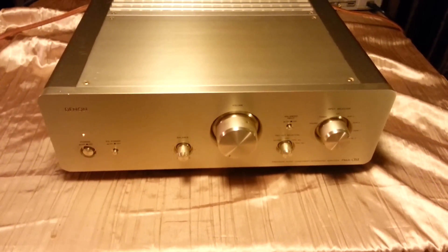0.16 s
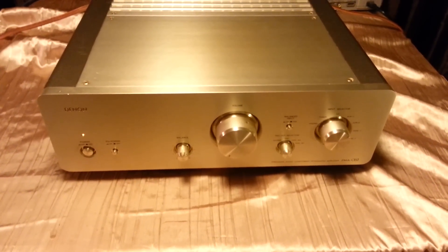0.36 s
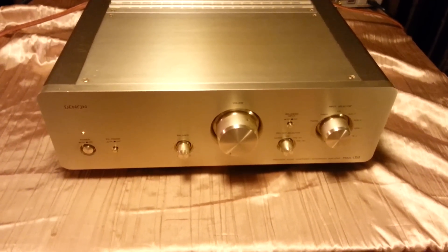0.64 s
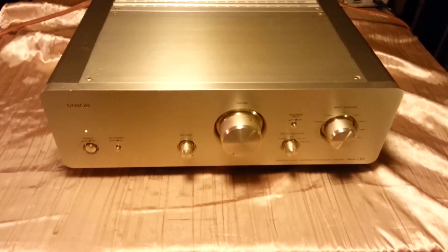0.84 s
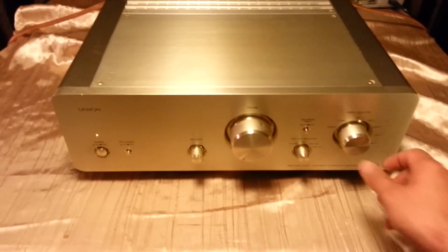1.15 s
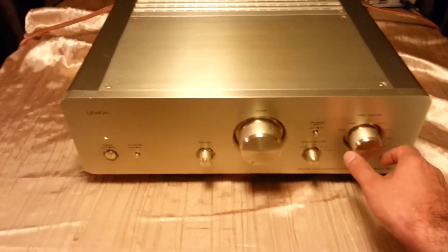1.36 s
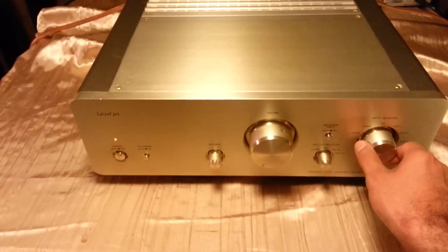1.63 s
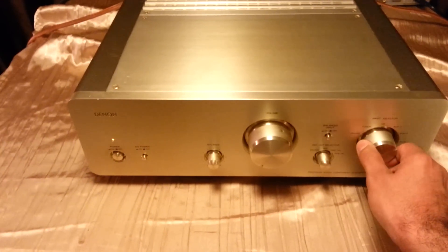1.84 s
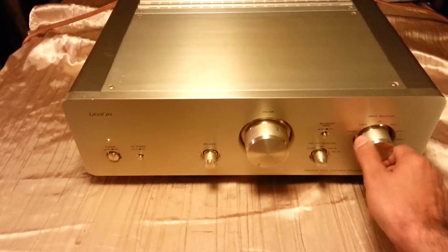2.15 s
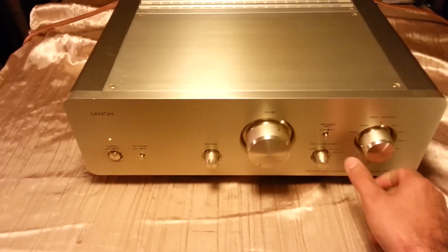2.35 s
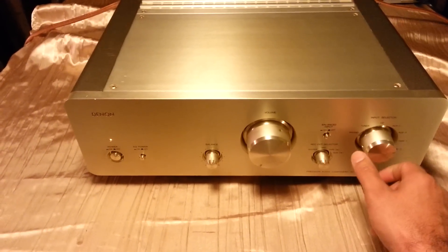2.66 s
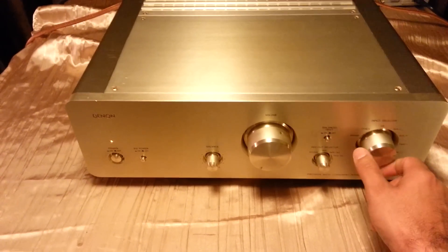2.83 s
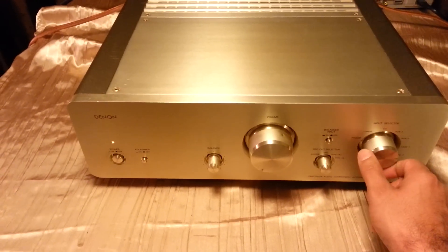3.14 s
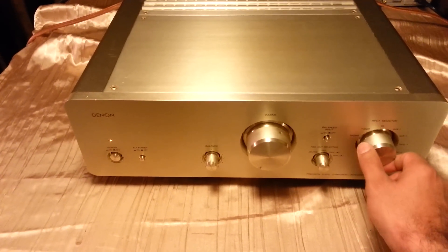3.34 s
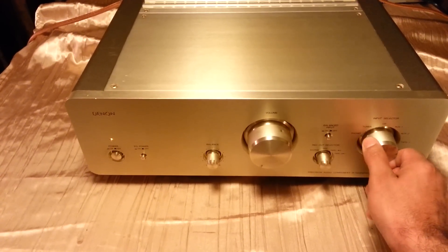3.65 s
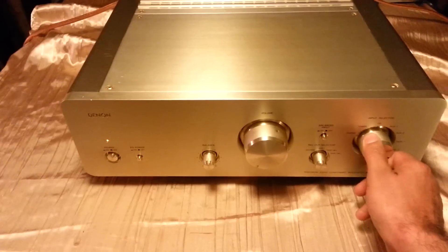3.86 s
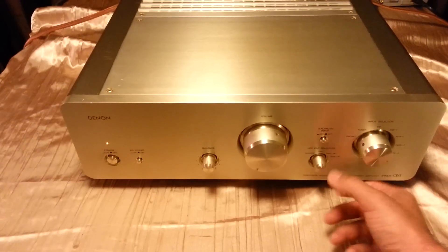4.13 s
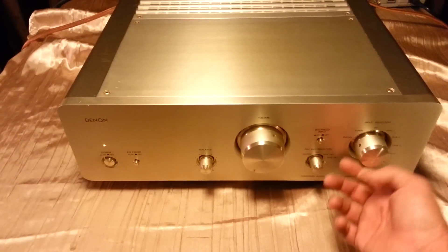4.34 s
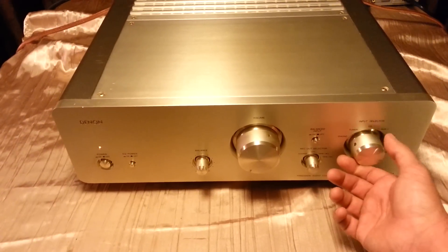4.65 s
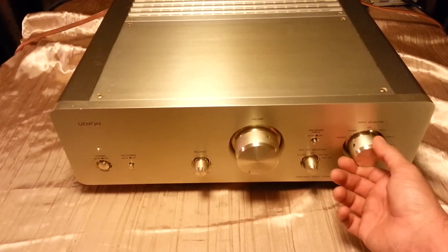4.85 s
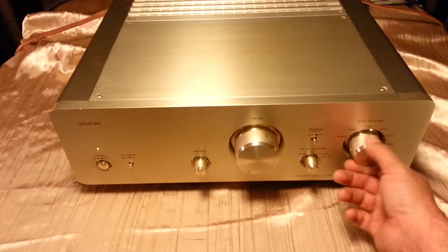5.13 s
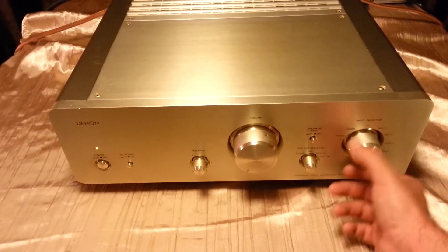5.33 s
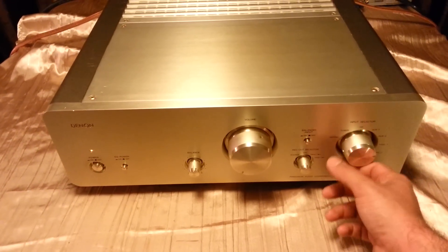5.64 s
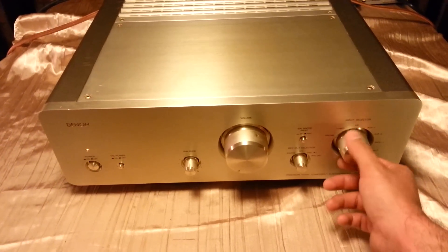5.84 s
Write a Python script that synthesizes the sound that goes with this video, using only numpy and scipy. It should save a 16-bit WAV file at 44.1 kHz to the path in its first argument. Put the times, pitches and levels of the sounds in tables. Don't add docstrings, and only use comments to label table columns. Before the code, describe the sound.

A stiff selector knob on a metal amplifier is turned three steps, each landing with a hard ringing clunk, over electrical buzz and low room hum.

```python
import sys
import numpy as np
from scipy import signal
from scipy.fft import rfft, irfft, next_fast_len
from scipy.io import wavfile
from scipy.ndimage import uniform_filter1d, map_coordinates

SR = 44100
rng = np.random.default_rng(int(sys.argv[2]) if len(sys.argv) > 2 else 0)


def log_audio(samples):
    frames = np.atleast_2d(samples).T
    limited = np.clip(frames, -1, 1)
    pcm = np.round(limited * 32767).astype(np.int16)
    wavfile.write(sys.argv[1], SR, pcm)


def elevation(decibels):
    levels = np.asarray(decibels, float)
    return 10 ** (levels / 20)


N = 264159

TOP_HZ = 14550
# ball leaves its notch (leave_s), clips the next edge (clip_s), drops home (drop_s)
TURNS = [
    (2.033, 2.0938, 2.099),
    (3.740, 3.8448, 3.8506),
    (5.155, 5.198, 5.2024),
]
# crack_db, rattle_db, rocking_db, panel_ring_db
FORCES = [
    (-9.5, -22, -4.5, -32),
    (-5.5, -20.5, 12.5, -24),
    (-3.5, -20.5, 8.5, -33),
]
# pitch_hz, width_hz, level_db
NOTCH = [(1420, 420, 3.5), (2000, 720, 4.5), (2700, 700, 5), (3430, 1500, 0.5), (5050, 1260, -3.5),
         (5570, 310, -7)]
# pitch_hz, width_hz, level_db
ROCKING = [(231, 32, 1.1), (488.2, 21, 4.8)]


def unit(x):
    return x / np.sqrt(np.mean(x ** 2) + 1e-20)


def along(points, hz):
    point_hz, value = np.transpose(points)
    return np.interp(np.log(hz + 1), np.log(point_hz + 1), value)


def filtered(x, response):
    size = next_fast_len(N + SR // 2)
    return irfft(rfft(x, size) * response(np.fft.rfftfreq(size, 1 / SR)), size)[..., :N]


def high_pass(f, hz, q):
    return -f * f / (hz * hz - f * f + 1j * f * hz / q)


def body(modes):
    def response(f):
        total = 0
        for k, (hz, width_hz, db) in enumerate(modes):
            resonance = 1j * f * width_hz / (hz * hz - f * f + 1j * f * width_hz)
            total = total + (-1) ** k * elevation(db) * resonance
        return total / np.sqrt(np.mean(abs(total) ** 2))
    return response


def ports(hz, alike):
    turn = np.arccos(np.clip(along(alike, hz), -1, 1)) / 2
    return np.array([[np.cos(turn), np.sin(turn)], [np.cos(turn), -np.sin(turn)]])


def wobble(rate):
    return map_coordinates(rng.standard_normal(int(N * rate / SR) + 4), [np.arange(N) * rate / SR])


def air():
    # pitch_hz, level_db per Hz
    rush_colour = [(30, -29), (60, -10), (100, -9.5), (200, -3), (300, -3.5), (420, -6.5), (650, -10),
                   (900, -14.5), (1500, -17), (2800, -19), (4500, -26), (6500, -29), (10000, -27),
                   (14400, -25.5)]
    # pitch_hz, likeness (0 to 1)
    rush_alike = [(60, 0.58), (250, 0.41), (600, 0.16), (1500, 0), (8000, 0)]
    # pitch_hz, level_db, unsteadiness_hz
    hum_tones = [(118.7, -59, 1.92), (180.4, -61, 5.44), (238, -63, 1.74), (277.6, -60, 7.75),
                 (373, -72.5, 0.88), (411, -55, 5.89), (864, -64.5, 5.93)]
    t = np.arange(N) / SR

    def colour(hz):
        return elevation(along(rush_colour, hz)) * (hz < TOP_HZ) * ports(hz, rush_alike)

    rush = unit(filtered(rng.standard_normal((2, N)), colour).sum(axis=1))
    rush_level = elevation(-50.5 + 0.4 * wobble(2.87))
    tones = 0
    for hz, db, unsteady_hz in hum_tones:
        level = elevation(db + 2.5 + 1.5 * wobble(10))
        cycles = hz * t + np.cumsum(unsteady_hz * wobble(12)) / SR
        tones = tones + level * np.sin(2 * np.pi * cycles)
    return rush_level * rush + tones * elevation([[.3], [-.3]])


def interference():
    # pitch_hz, level_db
    whine_tones = [(10250, -80), (13500, -83)]
    rate_hz, start_s, length_s = 30.0475, .0036, .00142
    t = np.arange(N) / SR
    square = 1.0 * ((t - start_s) * rate_hz % 1 < length_s * rate_hz)

    def input_stage(f):
        return high_pass(f, 186, 0.45) * high_pass(f, 110, 0.56) / (1 + 1j * f / 1300) ** 2

    pulse = elevation(-24.5 + 0.19 * wobble(39)) * filtered(square, input_stage)
    whine = sum(elevation(db) * np.sin(2 * np.pi * hz * t) for hz, db in whine_tones)
    return np.array([pulse + whine, -elevation(-22.0) * pulse])


def swipe():
    # start_s, centre_hz, level_db
    slide = [
        (.31, 2400, -88),
        (.34, 2500, -51.5),
        (.39, 2640, -48),
        (.45, 3200, -54),
        (.52, 3500, -63),
        (.6, 3600, -70),
    ]
    hz, t, noise = signal.stft(rng.standard_normal((2, N)), SR, nperseg=256)
    point_s, centre_hz, db = np.transpose(slide)
    friction = 1 / (1 + ((hz[:, None] - np.interp(t, point_s, centre_hz)) / 650) ** 2)
    rustle = 0.16 / (1 + ((hz[:, None] - 4000) / 1500) ** 2)
    shaped = noise * (friction + rustle) * elevation(np.interp(t, point_s, db))
    return 4 * signal.istft(shaped, SR, nperseg=256)[1][:, :N]


def even(spectrum, bins):
    return spectrum / np.sqrt(abs(uniform_filter1d(abs(spectrum) ** 2, size=bins)) + 1e-20)


def tail(hz, size):
    # pitch_hz, decay_s
    room_decay = [(200, 0.46), (500, 0.44), (1200, 0.35), (2500, 0.26), (3500, 0.24), (4100, .18),
                  (7000, 0.33), (13000, 0.083)]
    f, t, noise = signal.stft(rng.standard_normal((2, SR // 3)), SR, nperseg=256)
    echo = signal.istft(noise * elevation(-60 * t / along(room_decay, f)[:, None]), SR, nperseg=256)[1]
    late_echo = np.pad(echo, ((0, 0), (250, 0)))
    return even(rfft(late_echo, size), bins=60) * np.sqrt(along(room_decay, hz) / 0.31)


def contacts(rows, frame, ring):
    # pitch_hz, width_hz, level_db
    fizz = [(6700, 1100, -0.5), (7700, 2250, -1.5), (10550, 2100, 3), (11700, 2300, 1.5),
            (15200, 1200, 0.5)]
    # pitch_hz, width_hz, level_db
    case = [(266, 61, -9), (375, 77, 3), (461, 34, 6.5), (561, 33, 0.5), (818, 89, -4.5), (885, 70, 1)]
    # pitch_hz, likeness (0 to 1)
    near_alike = [(200, 1), (600, 0.62), (1200, 0.33), (3000, 0.2), (8000, 0.11)]
    # pitch_hz, likeness (0 to 1)
    far_alike = [(200, 0.85), (700, 0.8), (2000, 0.04)]
    out, t, size = np.zeros((2, N + SR)), np.arange(SR // 10) / SR, 2 ** 15
    hz = np.fft.rfftfreq(size, 1 / SR)
    parts = [body(modes)(hz) for modes in (frame, fizz, case, ring)]
    near, far = ports(hz, near_alike), ports(hz, far_alike)
    for start_s, db, length_s, fizz_db, thump_db, ring_db in rows:
        unevenness = elevation(3.1 * np.minimum(rng.standard_exponential(len(t)), 4))
        blows = rng.standard_normal((2, len(t))) * unevenness
        lengths_s = (length_s, length_s, length_s + 0.0081, length_s)
        sound = 0
        for part, rel_db, d in zip(parts, (0, fizz_db, thump_db, ring_db), lengths_s):
            rise = np.minimum(t / min(0.6 * d, .0012), 1)
            shape = rise * np.exp(-((t - 0.22 * d) / d) ** 2)
            level = elevation(db + rel_db) * np.linalg.norm(shape)
            sound = sound + part * level * even(rfft(shape * blows, size), bins=90)
        direct = (near * sound).sum(axis=1)
        echo = elevation(-9) * (far * sound * tail(hz, size)).sum(axis=1)
        out[:, round(start_s * SR):][:, :size // 2] += irfft(direct + echo, size)[:, :size // 2]
    return out[:, :N]


def hand():
    # start_s, level_db, length_s, thump_db
    touches = [
        (0.32, -34.5, 0.016, -14),
        (.365, -43.5, .023, -9),
        (1.733, -44.5, 0.0046, 6),
        (3.532, -58.5, 0.0092, 13.5),
    ]
    # pitch_hz, width_hz, level_db
    palm = [(372, 24, 18.5), (547, 130, 2), (2500, 1900, -33), (4200, 1000, -17)]
    rows = [(s, db, length_s, -31, thump_db, -41) for s, db, length_s, thump_db in touches]
    return contacts(rows, palm, ROCKING)


def loose_parts():
    # start_s, level_db, length_s
    ticks = [(0.061, -58, 0.026), (0.685, -45, 0.0016), (0.889, -48, 0.0025), (1.4, -52, 0.0068),
             (1.731, -52, 0.014), (2.236, -55, 0.018), (2.401, -32.5, 0.013), (2.463, -47, 0.013),
             (3.532, -58, 0.0073), (4.024, -37, 0.015), (4.211, -37.5, 0.0077), (5.497, -32, 0.0097),
             (5.555, -45.5, 0.014)]
    # pitch_hz, width_hz, level_db
    shaft = [(1370, 350, 6.2), (2460, 740, 13.7), (2720, 350, 14.5), (3320, 170, 1.3), (4050, 130, 6.8),
             (4400, 2140, 6.1)]
    # pitch_hz, width_hz, level_db
    collar = [(2480, 210, 5.3), (2960, 80, 2.6), (4520, 690, 2.7)]
    return contacts([(*tick, -13.5, -13.5, 1.5) for tick in ticks], shaft, collar)


def relays():
    # start_s, level_db, scrape_db, rebound_delay_s, rebound_db
    closings = [
        (.096, -32, -31, 0.016, 1.5),
        (2.654, -30, -13, .010, -2),
        (4.415, -30.5, -12, .010, -1),
        (5.757, -30, -12.5, .010, -1.5),
    ]
    # pitch_hz, width_hz, level_db
    reed = [(1140, 440, -0.5), (1980, 310, -9.5), (2400, 480, 2.5), (3036, 390, 0), (3480, 107, 7),
            (4480, 740, -1), (5330, 160, -2), (5800, 350, -13.5)]
    # pitch_hz, width_hz, level_db
    armature = [(1820, 120, -1), (1874, 85, 16.5), (2620, 140, -6), (3420, 160, 2)]
    rows = []
    for s, db, scrape_db, delay_s, rebound_db in closings:
        rows.append((s - .012, db + scrape_db, 0.013, -12, -39, -4))
        rows.append((s, db, 0.009, -3, -15.5, -8))
        rows.append((s + delay_s, db + rebound_db, 0.0097, -6, -10.5, 0.77))
    return contacts(rows, reed, armature)


def panel():
    # pitch_hz, level_db, decay_s (time to fall by 60 dB)
    panel_modes = [(1100, -9, 0.27), (1163, -6, 0.62), (1390, -8, 0.29), (1536, -7, 0.47), (1670, -6, 0.34),
                   (1900, -2, 0.17), (1965, 1, 0.4), (2218, -1, 0.3), (2410, -5.5, 0.24), (2750, -4, 0.24),
                   (2960, 4, 0.15), (3100, -14, 0.26), (3300, -11, .26), (3450, 4, 0.069)]
    scatter_db, split_hz = 2.5, 14
    out, t = np.zeros((2, N + SR)), np.arange(SR // 3) / SR
    hz, level_db, decay_s = np.transpose(panel_modes)[:, :, None]
    for (_, _, drop_s), (_, _, _, ring_db) in zip(TURNS, FORCES):
        chance, phase = rng.standard_normal((2, 2, len(panel_modes), 1))
        fading = elevation(level_db + scatter_db * chance - 60 * t / np.clip(decay_s, .05, .3))
        ring = fading * np.sin(2 * np.pi * hz * t + 3 * phase)
        ring = ring * np.cos(2 * np.pi * split_hz * (1 + abs(phase)) * t + chance)
        onset = 1 - np.exp(-t / 0.00067)
        out[:, round(drop_s * SR):][:, :len(t)] += elevation(ring_db) * ring.sum(axis=1) * onset
    return out[:, :N]


def rocking():
    # pitch_hz, width_hz, level_db
    feet = [(225, 12.4, 3.5), (253.3, 8, -4.5), (386.5, 9.1, -8.5), (411, 11, -12.5), (474, 7.7, 2),
            (500, 14, 4.5), (640, 8.4, -14), (830, 8.1, -7), (867, 17, -10.5), (964, 6.7, -9)]
    blow, push = np.zeros(N), np.zeros(N)
    for (_, _, drop_s), (crack_db, _, rocking_db, _) in zip(TURNS, FORCES):
        blow[round((drop_s + .0003) * SR)] = elevation(crack_db + 9.5)
        push[round(drop_s * SR)] = elevation(rocking_db)
    return filtered(blow, body(NOTCH)) + filtered(push, body(feet))


def detent():
    edge_levels = [-23, -20, -22]
    # start_s, level_db, length_s
    settling = [(2.2035, -28, .002)]
    # pitch_hz, width_hz, level_db
    plate = [(656, 130, 5.5), (1210, 490, 6.5), (1500, 300, 6), (2300, 480, 7), (2970, 300, 5.5),
             (3500, 150, 5), (4180, 160, -2), (5230, 190, -0.5)]
    # pitch_hz, width_hz, level_db
    spring = [(1092, 69, -3), (2600, 43, -26), (4290, 57, -6)]
    # pitch_hz, width_hz, level_db
    stop = [(910, 170, 6), (1240, 19, 9), (1400, 320, 3), (2200, 630, 1), (2376, 63, 3.5), (2870, 270, 1.5),
            (3130, 640, 4), (4380, 480, -13.5), (4700, 190, -17)]
    rattle_drive = (-38, -8.5, 1)  # fizz, thump and ring in dB
    ride, strike, rattle = [], [], []
    for (leave_s, clip_s, drop_s), (crack_db, rattle_db, _, _), edge_db in zip(TURNS, FORCES, edge_levels):
        ride.append((leave_s, -25, 0.018, -10, -12, -1))
        strike.append((clip_s, edge_db, .0036, -14, -9, -55))
        strike.append((drop_s, crack_db, 0.0012, -10.5, -20.5, -22))
        rattle.append((drop_s + 0.001516, rattle_db, 0.012, *rattle_drive))
    rattle += [(*row, *rattle_drive) for row in settling]
    return contacts(ride, plate, spring) + contacts(rattle, stop, ROCKING) + contacts(strike, NOTCH, ROCKING)


def knob():
    together = detent() + rocking() + panel() + relays() + loose_parts() + hand()
    return filtered(together, lambda f: high_pass(f, 130, 1 / 1.4))


def scene():
    # pitch_hz, left minus right level_db
    side_levels = [(300, 0.5), (700, 3.5), (1300, -6.5), (2400, -7.5), (4500, -8), (8000, -1), (14000, -4)]

    def facing(hz):
        lag = np.exp(-1j * np.pi * hz * np.array([[2], [-2]]) / SR)
        return elevation(along(side_levels, hz) * np.array([[.5], [-.5]])) * lag

    return filtered(knob() + swipe(), facing) + air() + interference()


def roll_off(x):
    return signal.sosfilt(signal.butter(12, 15960, fs=SR, output="sos"), x)


def record(dry):
    clipped = dry / (1 + abs(dry / .93) ** 8) ** (1 / 8)

    def band_limit(hz):
        return elevation(np.interp(hz, [TOP_HZ - 50, TOP_HZ + 150, 15900, 16100], [0, -22, -30, -100]))

    return roll_off(filtered(clipped, band_limit))


dry = scene()
out = record(dry)
log_audio(out)
```